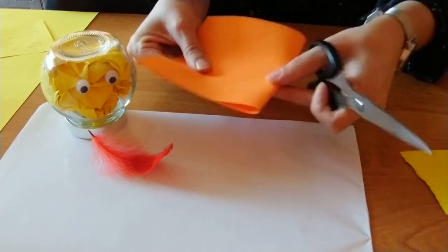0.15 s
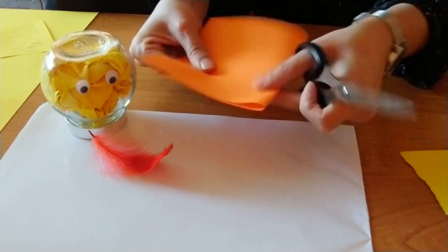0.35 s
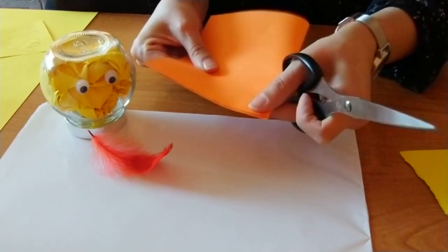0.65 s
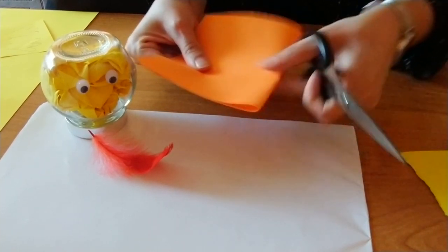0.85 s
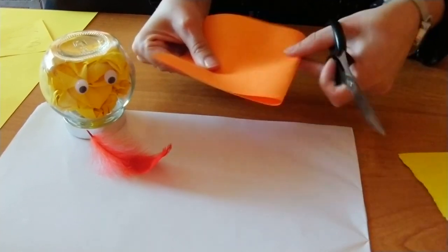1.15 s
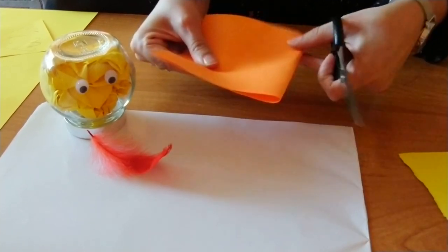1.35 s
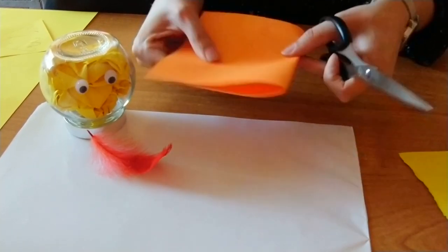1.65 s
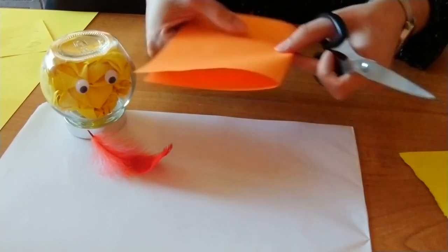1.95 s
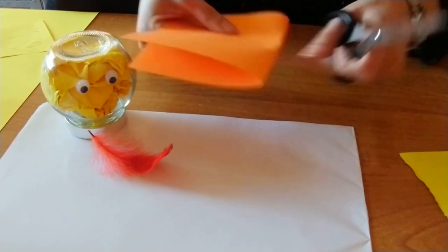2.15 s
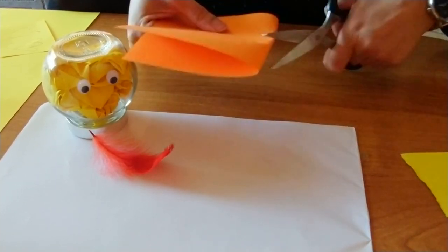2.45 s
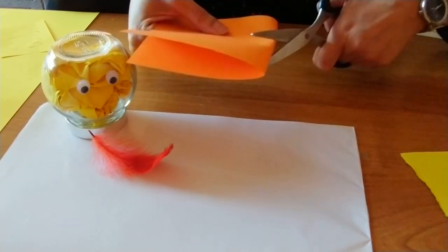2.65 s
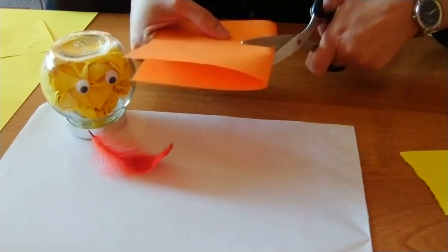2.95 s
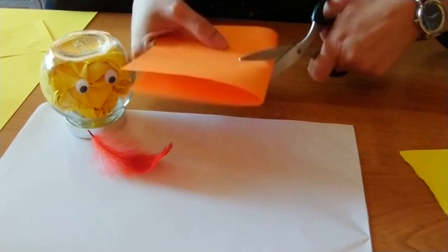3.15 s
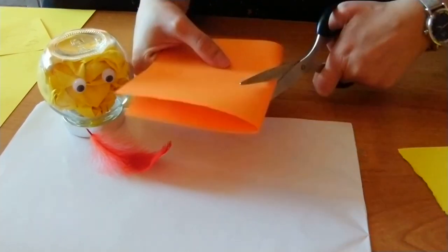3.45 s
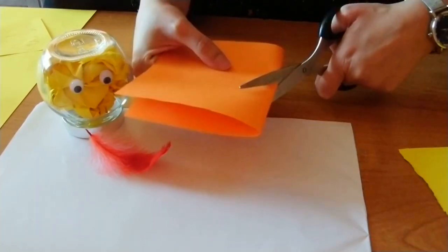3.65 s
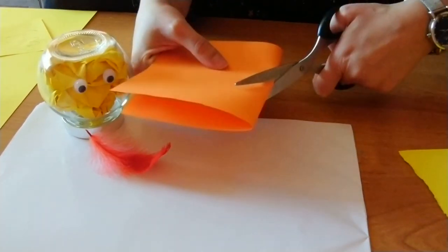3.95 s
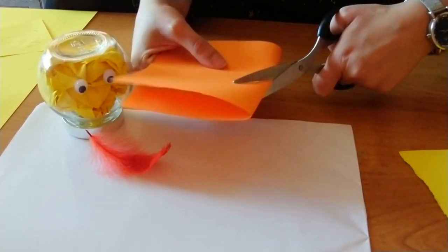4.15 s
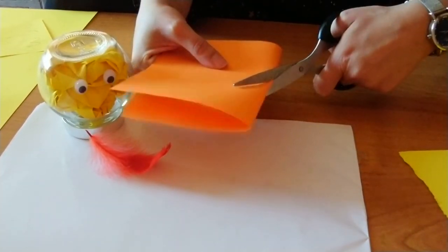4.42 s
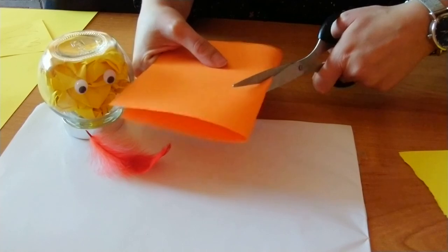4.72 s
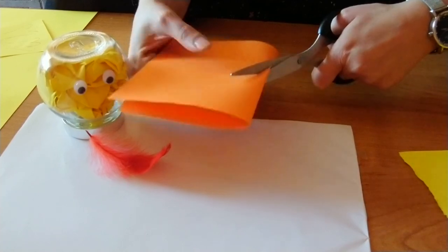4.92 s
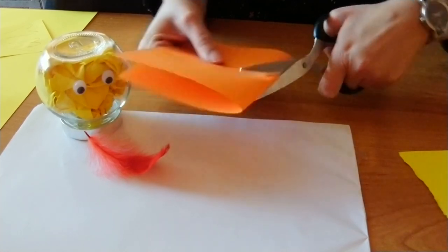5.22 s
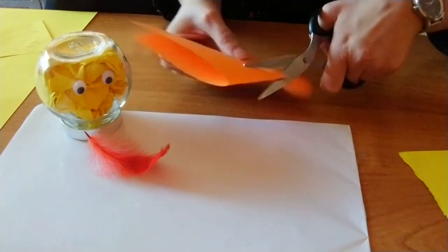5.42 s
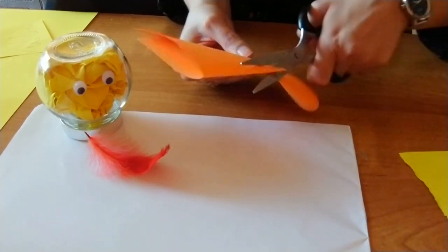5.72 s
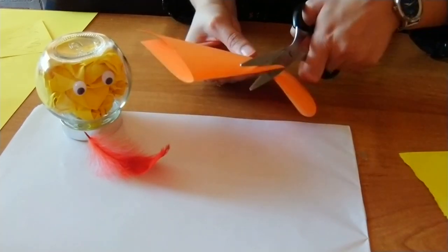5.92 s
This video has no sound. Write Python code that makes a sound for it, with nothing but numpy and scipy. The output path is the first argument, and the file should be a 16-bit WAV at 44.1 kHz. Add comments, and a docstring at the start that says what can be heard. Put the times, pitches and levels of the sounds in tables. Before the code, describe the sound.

Stiff folded paper snaps, crackles and rustles under fingers and scissors in a small room, with faint birdsong arriving from outside later.

```python
"""From the start a folded sheet of stiff paper is turned in the fingers and cut with scissors over a table.
It snaps as it buckles (bursts of noise with two ringing pitches), rustles and crunches (bands of clicks),
with dull thuds (low noise); the snaps thin out after 2.3 s and return from about 4.2 s.
From 3.2 s songbirds outside add faint whistles (gliding sines) and buzzes (tones shaken in pitch).
A small room rings behind paper and birds (echoes and fading noise); a hush and low noise run throughout."""
import sys
import numpy as np
from scipy import signal
from scipy.io import wavfile
from scipy.ndimage import uniform_filter1d

SR = 44100
rng = np.random.default_rng(int(sys.argv[2]) if len(sys.argv) > 2 else 0)


def transcribe(signal):
    """Save signal, clipped to [-1, 1], as a 16-bit WAV file at the path in sys.argv[1]."""
    frames = np.atleast_2d(signal).T
    limited = np.clip(frames, -1, 1)
    pcm = np.round(limited * 32767).astype(np.int16)
    wavfile.write(sys.argv[1], SR, pcm)


N = 268128  # length in samples, about 6.1 s
PORT_LAG = 2  # samples by which the right microphone port hears later


def gain_of(db):
    """Turn decibels into a factor for the wave."""
    return 10 ** (np.asarray(db) / 20)


def evened(x):
    """Scale a signal to an average (RMS) strength of 1."""
    return x / np.sqrt(np.mean(x ** 2) + 1e-20)


def read(points, hz):
    """Read every column of a table at these frequencies, along a logarithmic pitch scale."""
    f, *columns = np.transpose(points)
    return np.array([np.interp(np.log(hz + 1), np.log(f + 1), c) for c in columns])


def add(mix, s, sound):
    """Lay a sound into the mix from second s, cut off at the end."""
    part = mix[round(s * SR):][:len(sound)]
    part += sound[:len(part)]


def band(x, lo_hz, hi_hz):
    """Keep mainly the pitches between two limits."""
    sos = signal.butter(2, [lo_hz, min(hi_hz, SR / 2.1)], "band", fs=SR, output="sos")
    return signal.sosfilt(sos, x)


def pair(shape, likeness):
    """Random spectra for two channels that share part of their noise."""
    a, b, c, d = rng.standard_normal((4, *shape))
    left, other = a + 1j * b, c + 1j * d
    same = np.clip(likeness, 0, 1)[:, None]
    return np.array([left, same * left + np.sqrt(1 - same ** 2) * other])


def causal(log_gain):
    """Spectrum of the shortest filter with this log gain (full circle) that never answers early."""
    return np.exp(np.conj(signal.hilbert(log_gain)))


def peak(hz, centre_hz, height, share):
    """A resonance over an even floor; share is its half width over its pitch."""
    return 1 + height / (1 + ((hz - centre_hz) / (share * centre_hz)) ** 2)


def fibres(size, lo_hz, hi_hz, per_s):
    """Fibres slip in clumps: a train of uneven clicks, heard through one band."""
    clumps = gain_of(3.5 * evened(uniform_filter1d(rng.standard_normal(size), 350)))
    happens = rng.random(size) < per_s / SR
    return evened(band(rng.standard_normal(size) * happens * clumps, lo_hz, hi_hz))


def hush():
    """Hush of the room and the camera: steady noise, coloured by pitch, with faint patches."""
    # noise colour: f/Hz, left level/dB per Hz, right level/dB per Hz, left-right likeness (0 to 1)
    hush_colour = [(32.5, -120, -120, .3), (50, -87.5, -80.5, 0.07), (200, -92, -94, 0.091),
                   (890, -89.5, -90, 0.05), (1480, -94, -94.5, 0.021), (4830, -101, -98, 0.0092),
                   (5400, -100, -98.5, .01), (7200, -94, -106, .01), (7080, -99, -110, .01),
                   (7500, -111, -120, .01), (9600, -104, -108, .01), (11100, -112, -112, .01),
                   (13100, -111, -110, .01), (14200, -106, -106, .01)]
    frames, hz = N // 256 + 5, np.fft.rfftfreq(1024, 1 / SR)
    left_db, right_db, likeness = read(hush_colour, hz)
    patches = uniform_filter1d(rng.standard_normal((513, frames)), 10, 0)  # smooth over pitch
    patches = evened(uniform_filter1d(patches, 16, 1))  # and over time
    white = np.sqrt(1.5 * SR / 1024)  # puts 0 dB at unit power per Hz
    level_db = np.array([left_db, right_db])[..., None] + 0.63 * patches
    z = pair((513, frames), likeness) * white * gain_of(level_db)
    return signal.istft(z, nperseg=1024, noverlap=768)[1][:, :N]


def lows():
    """Rumble through the table, low thuds that come with the snaps, deep bass and a narrow hum: noise partly
    alike in both ports."""
    # low thuds that come with the snaps: t/s, level/dB
    thud_list = [(.12, -43.5), (.26, -53), (.95, -52.5), (1.1, -56), (1.25, -57), (1.56, -56), (2.1, -49.5),
                 (2.92, -60), (4.18, -58), (4.55, -53), (4.98, -54), (5.1, -58), (5.17, -58), (5.31, -53),
                 (5.5, -57), (5.72, -69)]
    # slow drift of the lows: t/s, deep bass level/dB, hollow hum level/dB
    drift_points = [(0, -64, -84), (.76, -69, -58.5), (1.3, -80, -70.5), (1.75, -63, -64), (2.15, -67, -64),
                    (2.65, -63.5, -70.5), (3.4, -74, -65.5), (3.7, -73, -80), (4.1, -78, -64),
                    (5.0, -63, -64.5), (5.7, -88, -59.5), (6.08, -80, -99)]
    rise_s, fall_s, rumble_db = 0.018, 0.037, -69.5
    s, deep_db, hum_db = np.transpose(drift_points)
    t, (a, b, c, d, e, f) = np.arange(N) / SR, rng.standard_normal((6, N))

    level = gain_of(rumble_db)
    for at, db in thud_list:
        level = level + gain_of(db) * np.exp(np.minimum((t - at) / rise_s, (at - t) / fall_s))
    table = evened(band(band(np.array([a, 0.85 * a + 0.51 * b]), 47, 169), 46, 420))
    table = table * gain_of([[-1.2], [1.2]])  # a little stronger on the right
    hum = evened(band(np.array([c, 0.86 * c + 0.49 * d]), 280, 368))
    deep = evened(band(band(np.array([e, 0.62 * e + 0.46 * f]), 34, 75), 34, 75))
    hum_level, deep_level = gain_of(np.interp(t, s, hum_db)), gain_of(np.interp(t, s, deep_db))
    return level * table + hum_level * hum + deep_level * deep


def tail():
    """Diffuse ring of the room: noise whose bands die at their own speeds; left energy is 1."""
    # how the room rings: f/Hz, time to fall by 60 dB/s, left-right likeness (0 to 1)
    room_ring = [(200, 0.092, 0.77), (594, 0.24, 0.97), (1380, 0.26, 0.42), (3700, 0.21, 0.008),
                 (9400, 0.12, .01)]
    hz, t = np.fft.rfftfreq(256, 1 / SR), np.arange(340) * 64 / SR
    t60, likeness = read(room_ring, hz)
    z = pair((129, 340), likeness) * gain_of(-60 * t / t60[:, None])
    ring = signal.istft(z, nperseg=256, noverlap=192)[1]
    build_up = np.minimum(np.arange(ring.shape[1]) / (.013 * SR), 1) ** 2  # the walls answer over 13 ms
    ring = ring * build_up
    return ring / np.linalg.norm(ring[0])


def room(x, direct_db, ring_db):
    """Direct sound, echoes from table and walls, and a tail that changes as the hands move."""
    # single echoes: delay/ms, left level/dB, right level/dB (against the direct sound)
    echo_list = [(1.718, -14, -19), (4.395, -16, -9), (5.973, -24, -14.5), (10.03, -10, -5.5),
                 (18.3, -33, -22), (26.3, -20.5, -29)]
    early = np.zeros((2, 1200))
    early[[0, 1], [0, PORT_LAG]] = 1
    for ms, left_db, right_db in echo_list:
        delay = round(ms * SR / 1000)
        early[[0, 1], [delay, delay + PORT_LAG]] += gain_of([left_db, right_db])
    direct = signal.oaconvolve(x[None], early, axes=1)[:, :N]

    turn = 2 * np.pi * 1.3 * np.arange(N) / SR  # two tails trade places, 1.3 turns a second
    late = np.zeros((2, N))
    for weight in (np.cos(turn), np.sin(turn)):
        late += signal.oaconvolve((x * weight)[None], tail(), axes=1)[:, :N]
    return gain_of(direct_db) * direct + gain_of(ring_db) * late


def ports(x):
    """Each microphone port lifts some pitches and dulls others, as a filter."""
    # colour of the two ports: f/Hz, left level/dB, right level/dB
    port_colour = [(60, 2.5, 10.5), (282, 3.5, -0.5), (1100, 0.5, 0), (1720, 0, 1.5), (1800, -5.5, -2),
                   (3220, 2, 0), (4190, -1.5, 3), (5240, -2.5, 9.5), (6440, 3.5, -8), (7784, 9, -7),
                   (7606, -8.5, -108), (8770, 8, -15.5), (11850, -10, -11.5), (16100, -9, -26)]
    log_gain = np.log(gain_of(read(port_colour, abs(np.fft.fftfreq(4096, 1 / SR)))))
    answer = np.fft.ifft(causal(log_gain)).real[:, :1024]
    return signal.oaconvolve(x, answer, axes=1)[:, :N]


def tone(pitch_hz):
    """A sine of average (RMS) strength 1 that follows a moving pitch."""
    return np.sqrt(2) * np.sin(2 * np.pi * np.cumsum(pitch_hz) / SR)


def birds():
    """Songbirds outside: whistles are near sines; buzzes are tones shaken fast in pitch."""
    # whistled notes: start t/s, length/s, first pitch f/Hz, pitch it glides towards f/Hz, level/dB
    whistle_notes = [(3.2, 0.12, 1933, 1880, -66.5), (3.638, 0.06, 3050, 3000, -70),
                     (3.693, 0.14, 2920, 2800, -57), (3.81, .07, 2900, 2880, -75),
                     (3.897, 0.066, 2800, 2400, -60.5), (3.844, 0.12, 4927, 4933, -64),
                     (4.302, 0.15, 4930, 4730, -59), (4.827, 0.17, 4785, 4655, -57),
                     (5.34, .15, 4670, 4615, -56), (5.756, 0.068, 3090, 3050, -60),
                     (5.868, 0.18, 4634, 4575, -54)]
    # buzzy notes: start t/s, length/s, centre f/Hz, size of the shake/Hz, level/dB
    buzz_notes = [(3.457, 0.11, 2320, 70, -71), (3.532, 0.066, 2385, 100, -66.5),
                  (3.95, 0.15, 2454, 141, -63.5), (4.039, 0.15, 4010, 200, -61.5),
                  (4.601, 0.093, 4020, 150, -57.5), (5.052, 0.16, 3795, 233, -59.5),
                  (5.349, 0.12, 3810, 232, -56.5), (5.598, .13, 3750, 230, -55)]
    out = np.zeros(N)
    for s, length, first_hz, last_hz, db in whistle_notes:
        u = np.arange(0, length, 1 / SR) / length
        pitch = last_hz + (first_hz - last_hz) * np.exp(-2.3 * u)  # glides most at first
        arch = np.sin(np.pi * u ** .75) ** .45  # one swell, loudest before the middle
        add(out, s, gain_of(db) * tone(pitch) * arch)
    for s, length, hz, shake_hz, db in buzz_notes:
        t = np.arange(0, length, 1 / SR)
        regular = np.sin(2 * np.pi * (85 * t + rng.random()))  # 85 shakes a second
        uneven = evened(uniform_filter1d(rng.standard_normal(len(t)), 150))
        pitch = hz + shake_hz * (regular + 0.36 * uneven)
        add(out, s, gain_of(db) * tone(pitch) * signal.windows.tukey(len(t), .4))
    # echoes and moving air on the long way in make the level flutter
    flutter = evened(uniform_filter1d(uniform_filter1d(rng.standard_normal(N), 300), 180))
    return out * gain_of(1.8 * flutter)


def rustle():
    """Steady rubbing of fibres in the panel and at the edge, with quick strokes on top."""
    # rubbing under fingers and blades: t/s, flutter level/dB (under 2 kHz), rasp level/dB (over 2 kHz)
    rub_points = [(0.0, -54.5, -57), (0.11, -40, -58), (0.3, -64, -53.5), (0.6, -61.5, -75),
                  (0.9, -81, -62), (1.12, -53, -48), (1.4, -68, -56.5), (1.78, -59, -65), (1.95, -80, -71),
                  (2.12, -44, -47.5), (2.22, -88, -86), (3.05, -69.5, -72.5), (4.1, -93, -75),
                  (4.55, -53.5, -58.5), (4.7, -67, -68.5), (5.25, -65.5, -57.5), (5.48, -47, -49),
                  (5.58, -60.5, -60), (5.78, -55.5, -56), (6.08, -73, -77)]
    # bright strokes of fingertip or blade along the sheet: start t/s, length/s, rasp level/dB, fizz level/dB
    stroke_list = [(0.464, 0.059, -52, -44), (0.591, 0.078, -52.5, -46.5), (0.745, 0.053, -57.5, -53),
                   (1.198, 0.11, -61, -43.5), (1.433, 0.072, -62, -48), (1.515, 0.031, -69, -47.5),
                   (1.752, 0.026, -51, -50), (2.166, 0.021, -50, -49), (2.316, 0.015, -47, -35.5),
                   (2.814, 0.017, -59.5, -71), (2.95, 0.037, -60, -55.5), (3.144, 0.08, -63.5, -57.5),
                   (4.425, 0.032, -73, -58), (4.55, 0.041, -65, -40.5), (4.707, 0.045, -70, -44),
                   (5.164, 0.024, -55, -53), (5.324, 0.066, -50, -46.5), (5.425, 0.034, -46, -63),
                   (5.726, 0.047, -54, -75), (5.849, 0.027, -55.5, -79)]
    crackle, fizz_share = gain_of(-9.5), gain_of(-1.5)  # against the rubbing; against the rasp
    s, flutter_db, rasp_db = np.transpose(rub_points)
    t = np.arange(N) / SR

    panel = fibres(N, 305, 1700, 700) + crackle * fibres(N, 380, 1580, 45)
    edge = fibres(N, 3270, 6450, 7000) + crackle * fibres(N, 4300, 6400, 120)
    edge += fizz_share * fibres(N, 6200, 18700, 8000)
    out = gain_of(np.interp(t, s, flutter_db)) * panel + gain_of(np.interp(t, s, rasp_db)) * edge

    rasp, fizz = fibres(N, 3130, 6940, 9000), fibres(N, 7200, 21600, 13000)
    for s, length, rasp_db, fizz_db in stroke_list:
        part = slice(round(s * SR), round((s + length) * SR))
        stroke = gain_of(rasp_db) * rasp[part] + gain_of(fizz_db) * fizz[part]
        out[part] += stroke * signal.windows.tukey(len(stroke), .3)
    return out


def snap(crack_db, flap_db, fizz_db, flap_hz, crack_hz):
    """A crease creeps, then lets go in a burst of slips; panel and crease ring at their own pitches."""
    t, hz = np.arange(-90, 1958) / SR, abs(np.fft.fftfreq(2048, 1 / SR))
    creep = np.exp(np.minimum(t, 0) / .00035)  # swells up before time 0
    burst = creep * np.exp(-(np.maximum(t, 0) / .0025) ** 2)  # fades over 2.5 ms
    # small slips of size 0.61 around a main slip of size 1 at time 0
    slips = np.fft.fft(0.61 * rng.standard_normal(len(t)) * burst + (t == 0))
    # taken off below, so that the slips together cover all pitches evenly
    even = uniform_filter1d(np.log(abs(slips)), size=25, mode="wrap")
    body_db = 0.5 + 0.55 * crack_db + 0.67 * flap_db  # the 2-4 kHz body grows with crack and flap
    colour = [(60, flap_db - 37.5), (380, flap_db - 3), (flap_hz + 1, flap_db), (1750, flap_db - 2.5),
              (2900, body_db), (4300, crack_db - 7.5), (7000, crack_db - 11),
              (9000, fizz_db - 6.0), (16000, fizz_db - 13.0)]  # f/Hz, level/dB
    rings = peak(hz, flap_hz, height=1.23, share=0.16) * peak(hz, crack_hz, height=1.13, share=0.13)
    log_gain = np.log(gain_of(read(colour, hz)[0]) * rings)
    return 12.56 * np.fft.ifft(slips * causal(log_gain - even)).real


def paper():
    """The sheet rustles under fingers and blades and snaps each time a crease gives way."""
    # snaps: t/s, crack level/dB (4-8 kHz), flap level/dB (under 2 kHz), fizz level/dB (over 8 kHz),
    # flap pitch f/Hz, crack pitch f/Hz; levels are relative
    snap_list = [(0.0403, -43, -54, -32, 401, 4930), (0.0523, -19.5, -34, -32, 1560, 3700),
                 (0.096, -27, -29.5, -52, 1010, 3910), (0.1123, -6.5, -13.5, -26, 1000, 5050),
                 (0.1208, -3, -15.5, -12.5, 650, 5640), (0.2561, -8.5, -18.5, -16.5, 1380, 3970),
                 (0.3256, -20, -24.5, -28, 1550, 4770), (0.405, -32.5, -62, -36.5, 640, 5570),
                 (0.512, -50, -36.5, -60, 505, 4500), (0.5377, -16.5, -27, -39, 890, 3900),
                 (0.813, -25.5, -28, -34.5, 1640, 5700), (0.9357, -32, -26, -34, 990, 4720),
                 (0.9393, -11, -21.5, -20.5, 1510, 4550), (1.0928, -40, -35, -52, 1030, 5020),
                 (1.1005, -15.5, -25, -25, 1090, 4030), (1.1075, -8.5, -14.5, -21.5, 1490, 4930),
                 (1.1944, -25, -24, -45, 1480, 4330), (1.2496, -24.5, -26, -55, 850, 5060),
                 (1.4442, -50, -35, -56, 600, 4400), (1.5, -56, -36, -59, 710, 5260),
                 (1.5478, -34, -35.5, -59, 565, 5430), (1.5615, -27.5, -27, -71, 930, 4100),
                 (1.5894, -39, -32, -69, 720, 3720), (1.6257, -35.5, -38, -64, 710, 3550),
                 (1.7001, -56, -27, -58, 670, 5130), (1.775, -45, -37, -68, 751, 5490),
                 (2.0755, -20.5, -22.5, -36, 1253, 4330), (2.0951, -10.5, -21, -30, 1450, 4200),
                 (2.114, -32, -16.5, -45, 1140, 4480), (2.3209, -27, -41.5, -59, 1570, 6000),
                 (2.807, -47, -37.5, -64, 640, 4730), (2.9122, -25.5, -23, -40, 825, 3820),
                 (2.9945, -47, -39.5, -64, 624, 3950), (4.1753, -8, -19.5, -24, 1690, 5450),
                 (4.5163, -13, -25.5, -22, 1050, 5330), (4.5788, -33, -35.5, -39, 1100, 5000),
                 (4.6883, -23.5, -26.5, -35, 1385, 5570), (4.729, -26.5, -49, -46, 1520, 5600),
                 (4.7456, -33, -38, -42, 1260, 7070), (4.7834, -56, -32, -68, 1010, 5520),
                 (4.8072, -47, -58, -69, 1010, 5040), (4.8707, -40, -37.5, -63, 740, 4900),
                 (5.03, -53, -40, -65, 1010, 4600), (5.073, -37, -38, -56, 1110, 3650),
                 (5.0924, -38, -42, -33.5, 463, 3830), (5.137, -48, -43, -65, 900, 4600),
                 (5.3048, -50, -36, -46, 479, 5220), (5.358, -40, -39, -62, 900, 4600),
                 (5.4885, -15, -17, -52, 1020, 5550), (5.549, -53, -46, -66, 1010, 4320),
                 (5.624, -29.5, -45, -57, 439, 3950), (5.7034, -72, -29, -60, 600, 3680),
                 (5.7531, -32, -36.5, -68, 427, 5400), (5.8346, -45, -32, -64, 720, 4540),
                 (5.9747, -36, -43.5, -62, 744, 4500)]
    out = rustle()
    for s, *shape in snap_list:
        add(out, s - 90 / SR, snap(*shape))  # starts early to leave room for the creep
    return out


def scene():
    """Paper and birds ring in the room and pass the ports; hush and lows are added."""
    in_room = room(birds(), direct_db=-0.5, ring_db=-7) + room(paper(), direct_db=-0.5, ring_db=-5.0)
    return hush() + lows() + ports(in_room)


def record(dry):
    """Clips near full scale; the treble steps down at 15.8 kHz and ends at 16.7 kHz."""
    low = signal.firwin(511, 15800, window=("kaiser", 6), fs=SR)
    step = .1 * signal.unit_impulse(511, "mid") + .9 * low  # a tenth is left above the step
    edge = signal.firwin(511, 16700, window=("kaiser", 11), fs=SR)
    return signal.oaconvolve(np.clip(dry, -.95, .95), np.convolve(step, edge)[None], "same", axes=1)


dry = scene()
out = record(dry)
transcribe(out)
```